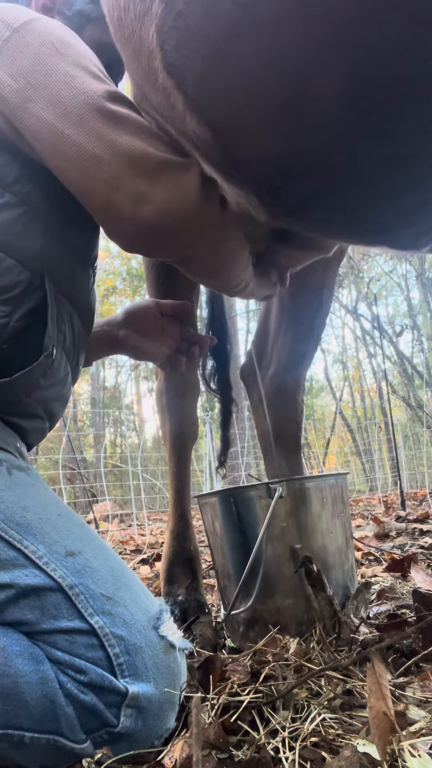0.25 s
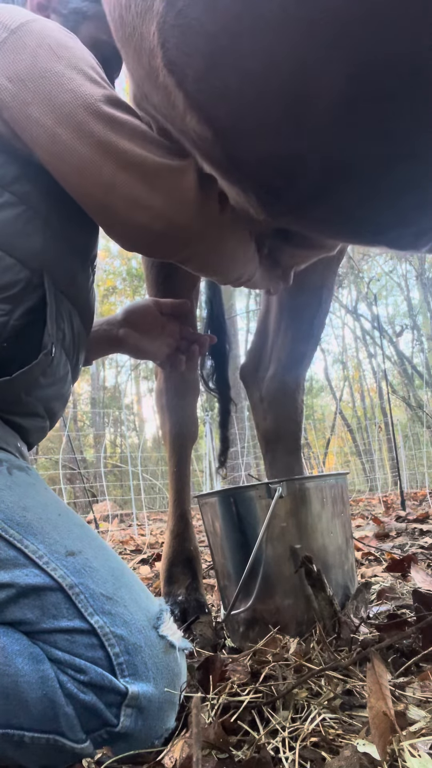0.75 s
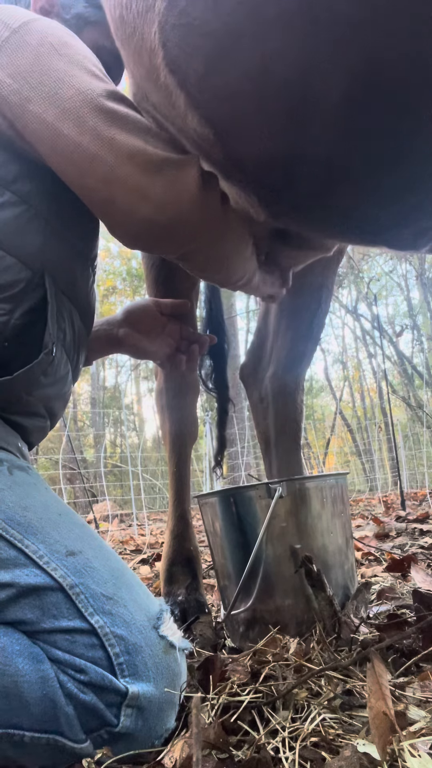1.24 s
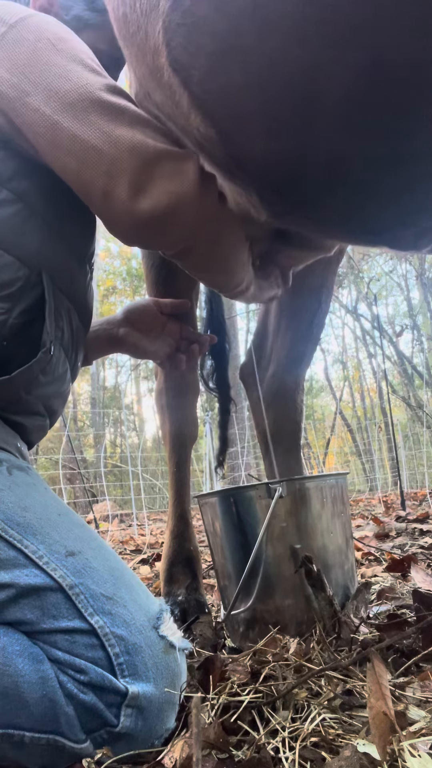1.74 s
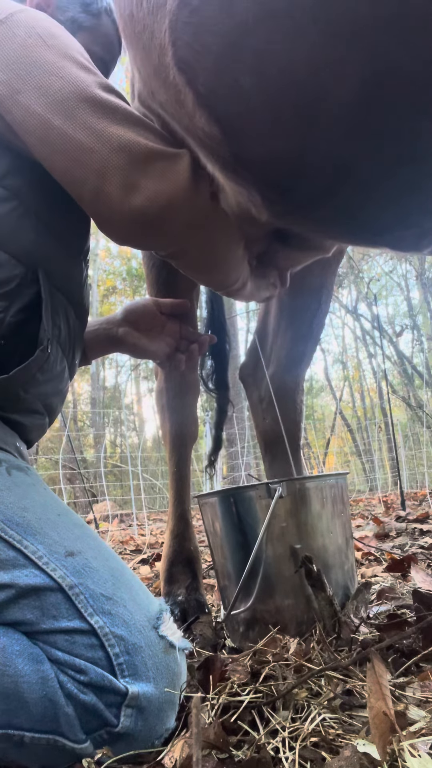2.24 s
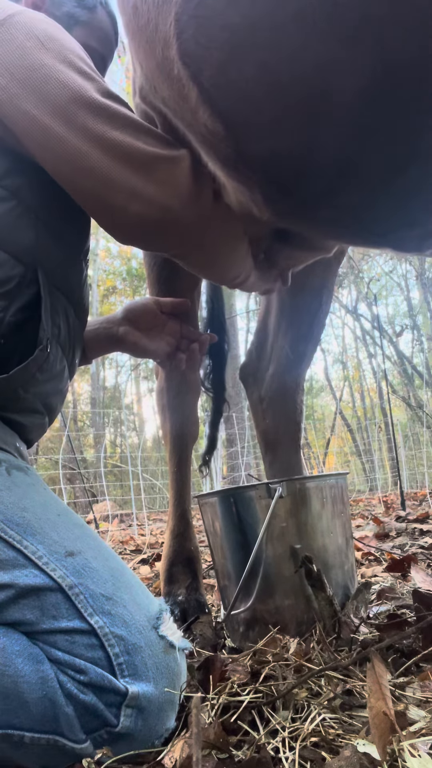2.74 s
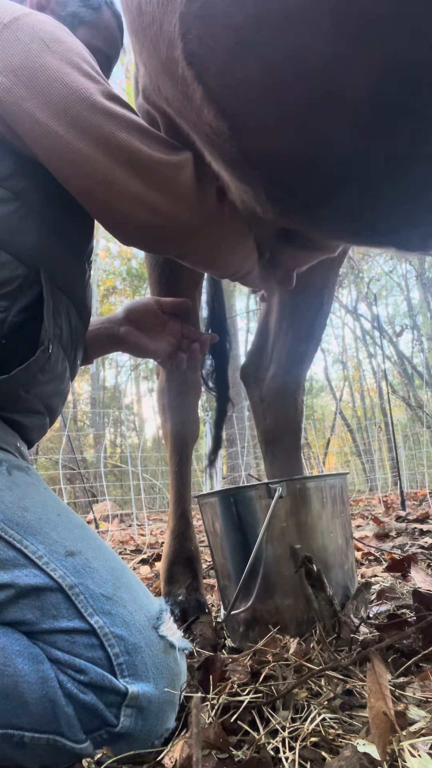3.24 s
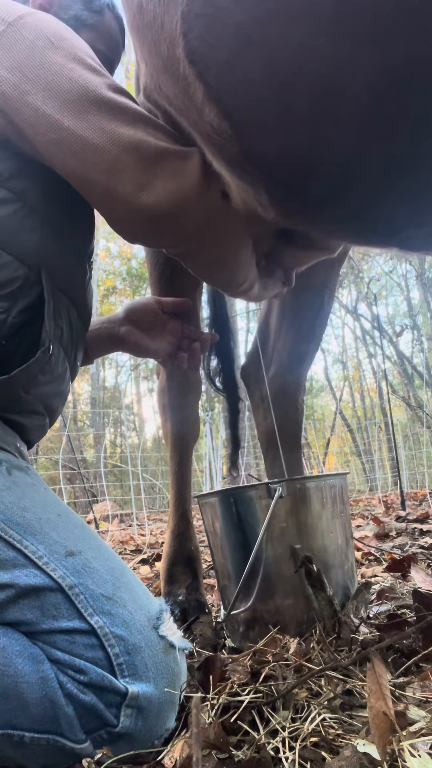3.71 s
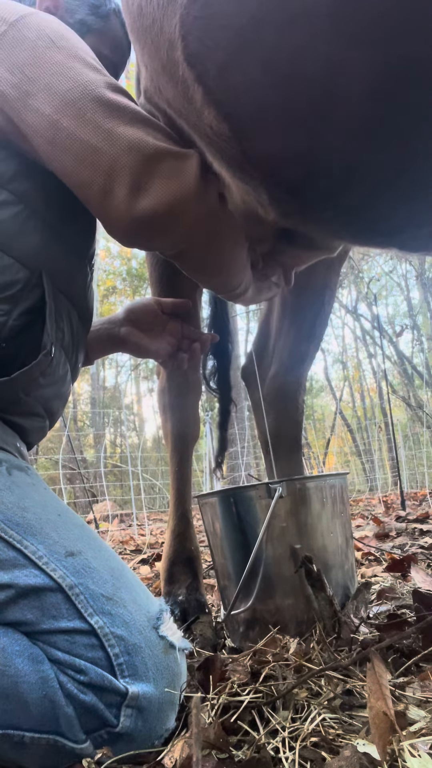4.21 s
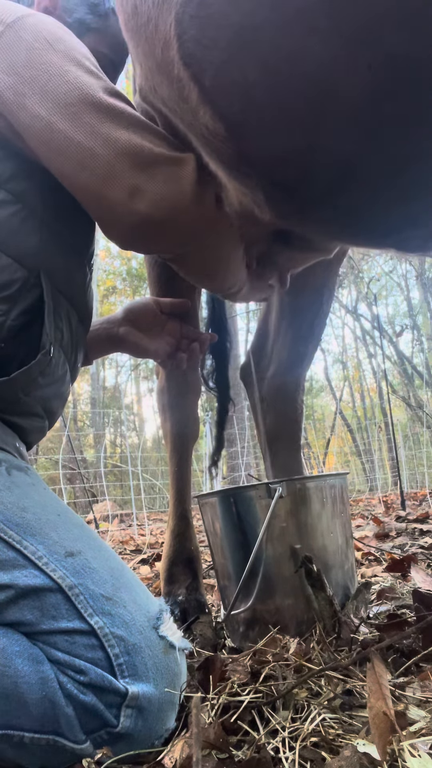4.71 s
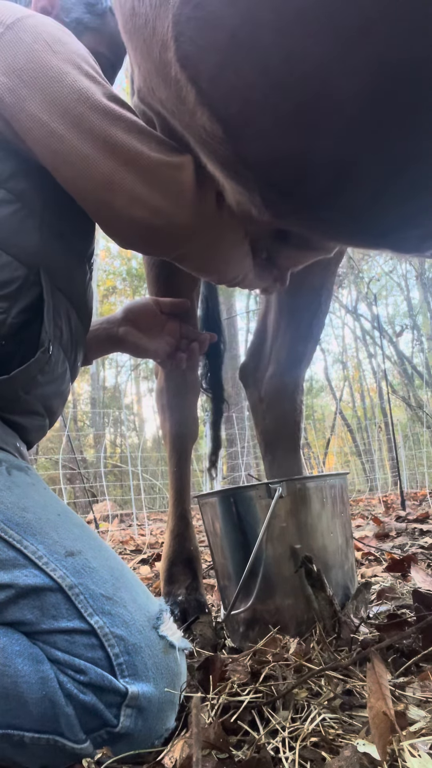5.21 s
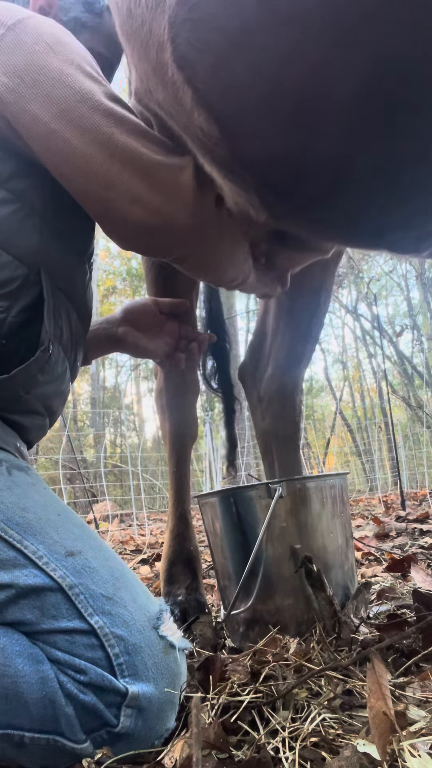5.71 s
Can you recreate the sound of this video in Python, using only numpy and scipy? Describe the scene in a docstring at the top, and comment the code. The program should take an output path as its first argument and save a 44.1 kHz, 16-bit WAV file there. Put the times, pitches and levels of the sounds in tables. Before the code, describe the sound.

Hand milking heard very close to a metal pail outdoors. The tail of one jet fades, then nine more follow at a steady pace, about one every two thirds of a second. Each swells as a foamy hiss, splats and gulps in the milk, rings the pail softly, then stops. Quiet woodland air and faint far rumble lie behind, in close stereo.

```python
"""Outdoors near woodland, close to a metal pail: a cow is milked by hand into frothy milk.
Nine jets plunge in after the tail of an earlier one. Each is shaped noise for spray, ringing bubbles
for froth and resonated clicks for the pail's air column; slugs splat, and trapped air gulps as short tones.
Behind lie a faint whine, filtered-noise woodland air and far rumble, all heard by two close microphone ports."""
import sys
import numpy as np
from scipy import signal
from scipy.fft import rfft, irfft
from scipy.io import wavfile
from scipy.ndimage import uniform_filter1d

SR = 44100
rng = np.random.default_rng(int(sys.argv[2]) if len(sys.argv) > 2 else 0)


def persist_wave(psi):
    """Save psi, clipped to +-1, as 16-bit WAV."""
    counts = np.round(np.clip(psi, -1, 1) * 32767).astype(np.int16)
    wavfile.write(sys.argv[1], SR, np.atleast_2d(counts).T)


N = 262836  # samples, just under 6 s

# Woodland air, relative spectrum: pitch_hz [Hz], level_db [dB per Hz]
AIR_SPECTRUM = [(15, -55), (25, -33), (59, 1.5), (107, 5.5), (314, -6.5), (724, -22.5), (973, -15.5),
                (1760, -42), (2300, -17), (3700, -16), (5000, -19), (9000, -34), (15700, -29)]
# Far rumble over time: time_s [s], level_db [dB]
RUMBLE_LEVEL = [(0.0, -50), (0.1, -74), (0.7, -70), (1.35, -57), (1.55, -67), (2.1, -59), (2.7, -60.5),
                (3.3, -61.5), (3.97, -55.5), (4.3, -60), (4.65, -70), (5.14, -55.5), (5.3, -78),
                (5.96, -69)]
# Far rumble, relative spectrum: pitch_hz [Hz], level_db [dB]
RUMBLE_SPECTRUM = [(20, -49), (45, -4.0), (75, 1), (130, -3.5), (230, -2.0), (500, -16.0), (900, -69)]
# Faint thin whine over time: time_s [s], level_db [dB], pitch_hz [Hz]
WHINE_CURVE = [(1.97, -93, 3500), (2.01, -71, 3530), (2.1, -65, 3740), (2.18, -66.5, 3800),
               (2.22, -81, 3730)]
# Pockets of air driven under the milk: start_s [s], level_db [dB], pitch_hz [Hz]
GULP_EVENTS = [(0.029, -46, 453), (0.304, -44, 382), (0.369, -39, 400), (0.448, -30.5, 442),
               (0.49, -28, 377), (0.513, -26.5, 362), (0.539, -26.5, 374), (0.63, -26, 375),
               (1.099, -26, 334), (1.144, -28, 348), (1.178, -37, 328), (1.615, -36, 370),
               (1.639, -44, 383), (1.74, -26.5, 363), (2.098, -33.5, 148), (2.285, -33, 382),
               (2.319, -28, 363), (2.349, -35, 350), (2.369, -28, 324), (2.429, -24, 331),
               (2.917, -41, 352), (3.001, -30, 350), (3.093, -31.5, 329), (3.54, -28, 352),
               (3.565, -35.5, 362), (3.601, -20.5, 362), (3.69, -46, 340), (3.755, -28, 336),
               (3.765, -34.5, 490), (3.779, -36, 317), (4.094, -40, 248), (4.154, -26.5, 369),
               (4.242, -49, 350), (4.405, -39, 311), (4.453, -48, 354), (4.739, -32, 395),
               (4.801, -22, 348), (4.88, -36, 378), (4.931, -29, 352), (5.114, -30, 157), (5.404, -37, 342),
               (5.454, -39, 380), (5.512, -34, 325), (5.612, -35, 348)]
# Slugs of milk breaking on the surface: start_s [s], level_db [dB], bubble_hz [Hz],
# bubble_over_spray_db [dB], bright_band_hz [Hz]
SPLAT_EVENTS = [(0.02, -45, 2550, -23, 3600), (0.2319, -41, 1950, -3.5, 5740),
                (0.2658, -52, 1550, -14, 6540), (0.3231, -34.5, 1460, -7.5, 7440),
                (0.359, -35, 1460, -16, 5420), (0.4033, -29.5, 1840, -10.5, 3660),
                (0.4782, -40, 1400, -6, 3640), (0.5539, -33.5, 1980, -13, 5460),
                (0.603, -44, 1390, -6, 8800), (0.678, -53, 1460, -2, 6100), (0.746, -63, 1460, 11, 3910),
                (0.9007, -44, 2360, -12.5, 6380), (0.9281, -43, 2300, -3.5, 6400),
                (1.017, -42, 1480, 2.5, 2950), (1.2236, -39.5, 2250, -7.5, 6650),
                (1.27, -47, 2026, 5, 6550), (1.321, -43.5, 1585, -9.5, 3100),
                (1.5505, -42.5, 1590, -11.5, 6460), (1.5958, -42.5, 2240, 1, 4900),
                (1.6487, -34.5, 2340, 0.5, 2800), (2.193, -46.5, 1950, -16, 4640),
                (2.2125, -42.5, 1950, -10.5, 6400), (2.2689, -47, 1690, 7.5, 8400),
                (2.2949, -43.5, 1460, 13, 4960), (2.5007, -40, 2170, -1.5, 10100),
                (2.616, -65, 1540, 4, 2860), (2.6609, -61, 1370, 4.5, 2990), (2.825, -39, 1680, -25, 6600),
                (2.8647, -36, 1540, -18.5, 4650), (2.9237, -35, 1610, -8, 9600),
                (2.9462, -39.5, 1450, 6, 2860), (2.9783, -36, 1460, 4.5, 6100),
                (3.257, -48, 1570, -21, 8250), (3.463, -35.5, 1860, -35, 7600),
                (3.4796, -35, 1190, -11, 6800), (3.5359, -29.5, 1940, -6.5, 8470),
                (3.5792, -30.5, 1630, -16, 7260), (3.681, -42.5, 970, 2, 7300),
                (3.742, -45, 1550, -22.5, 6200), (3.7712, -35, 1020, -9, 9300),
                (4.0114, -61.5, 950, 6.5, 4030), (4.0887, -48, 960, -4, 3700),
                (4.109, -37, 2270, -14, 7840), (4.134, -43, 1600, -21, 5150), (4.1585, -52, 1615, 9, 6400),
                (4.1935, -35.5, 1536, -3.5, 8000), (4.4105, -39, 1006, -5.5, 9100),
                (4.5208, -51, 1090, -8, 7000), (4.6087, -61.5, 2110, 3.5, 2820),
                (4.717, -46, 1510, -30, 10100), (4.7368, -30, 1380, -34, 11500),
                (4.7984, -33.5, 1855, 4, 3600), (4.832, -33, 1450, -4.5, 3600),
                (5.0863, -56, 2220, -14, 9700), (5.1437, -47.5, 1020, -6.5, 3450),
                (5.3513, -48.5, 1940, -15, 5570), (5.3773, -46, 1980, -21, 7040),
                (5.434, -36.5, 2220, -2.5, 9300), (5.488, -38.5, 1465, 4, 6840),
                (5.7234, -51, 1810, -20, 6400), (5.789, -47.5, 1860, -2, 4800),
                (5.8542, -56, 2350, 0, 3880)]
# Spray hiss, relative spectrum: pitch_hz [Hz], level_db [dB per Hz]
SPRAY_SPECTRUM = [(400, -59), (1000, -9), (2000, -3), (3000, -2), (4200, -3), (6400, -0.5), (7400, -3),
                  (10500, 1), (15700, -4)]
# Resonances of the pail above the milk: pitch_hz [Hz], width_hz [Hz], level_db [dB]
PAIL_MODES = [(636, 70, -9.5), (954, 220, -6), (1190, 53, -6.5), (1460, 150, -10), (1618, 47, -4.5),
              (1950, 92, -6.5), (2220, 27.6, -1.5), (2640, 27, -44), (3500, 110, -9), (4380, 130, -11)]
# One row per squeeze: start_s [s], full_pressure_after_s [s], column_stilled_after_s [s], length_s [s],
# spray first_db, full_db, last_db [dB]; froth full_db, end_db, settling_db [dB];
# air column early_db, late_db [dB], pitch_hz [Hz]
SQUEEZES = [(-0.4, .1, .38, 0.42, -31, -46, -51.5, -44, -59, -60.5, -45, -50, 430),
            (0.229, 0.18, 0.4, 0.48, -50.5, -44.5, -62, -41.5, -57, -72, -46.5, -45, 358.5),
            (0.897, 0.15, 0.34, 0.4, -47, -44, -57.5, -41, -59, -62.5, -47, -45.5, 357),
            (1.543, 0.13, 0.27, 0.35, -50, -43.5, -53, -42.5, -53, -56.5, -47.5, -41, 366),
            (2.193, 0.12, 0.29, 0.35, -48.5, -46, -55.5, -43.5, -52.5, -60, -46, -42.5, 350),
            (2.818, 0.15, .33, 0.37, -50, -45, -55, -40.5, -56.5, -64.5, -45, -48, 365),
            (3.456, 0.11, 0.36, 0.42, -46.5, -47.5, -59, -41.5, -63.5, -67, -45.5, -45.5, 354),
            (4.088, 0.12, .38, .37, -45, -46.5, -60, -41, -59, -63.5, -49.5, -50, 365),
            (4.713, 0.099, 0.29, 0.39, -49, -43, -60.5, -40.5, -59.5, -72, -45, -46.5, 364),
            (5.353, 0.12, 0.36, 0.37, -44.5, -46, -56.5, -40.5, -57, -64, -42.5, -50, 371)]
# Phase between the microphone ports: pitch_hz [Hz], left_lead_rad [radians]
PORT_LEAD = [(60, -.07), (600, -.25), (800, 1), (1150, 1.3), (1450, -.3), (2450, -.15), (2750, -1.5),
             (3080, -2.9), (3450, 0), (6500, -.12), (8600, -.95), (11200, -1.95), (13500, -np.pi),
             (16000, -np.pi)]
# Level between the ports: pitch_hz [Hz], left_over_right_db [dB]
PORT_TILT = [(40, 0), (110, -2), (260, -5), (450, -5.5), (620, -9), (950, -2.5), (1290, 3), (1600, 0),
             (16000, 0)]
# Likeness of the ports: pitch_hz [Hz], likeness [0 to 1]
PORT_LIKENESS = [(60, .996), (200, .985), (450, .97), (750, .3), (950, .7), (1290, .5), (1500, .95),
                 (2300, .88), (2600, .4), (3050, .8), (3300, .3), (4000, .85), (4800, .25), (6400, .96),
                 (8600, .8), (12500, .8), (14000, 1)]

EDGE_HZ = 15750  # upper band limit
AIR_DB = -62
GULP_T60_S, GULP_RISE_S = 0.081, 0.0085
KNOCK_DB = 12.5  # short knock of a slug, against its bubble
SILENT_DB, TAIL_S = -95, .4  # level around each stroke, and length of its last fade
SPRAY_RISE_S, SPRAY_STOP_S, SPRAY_STOP_DB, SPRAY_FADE_DB_PER_S = 0.022, 0.048, -13, 11
FROTH_START_DB, FROTH_EASE_S, FROTH_EASE_DB = -25.5, 0.057, -7
FROTH_STOP_S, FROTH_FADE_DB_PER_S = 0.026, 60
COLUMN_START_DB, COLUMN_STILL_S, COLUMN_STILL_DB = -24.5, 0.024, -12
COLUMN_FADE_DB_PER_S, COLUMN_SAG_HZ_PER_S = 91, 94
THRUM_DB = -10.5  # low thrum of the pail, against the air column


def gain_of(db):
    """Decibels to amplitude."""
    return 10 ** (np.asarray(db) / 20)


def evened(x):
    """Scales to rms 1."""
    return x / np.sqrt(np.mean(x ** 2) + 1e-20)


def read(points, hz):
    """Reads a spectrum table at given frequencies, on a log frequency scale."""
    table_hz, value = np.transpose(points)
    return np.interp(np.log(hz + 1), np.log(table_hz + 1), value)


def curve(rows, axis):
    """One column of a time table at every sample."""
    rows = np.array(rows)
    return np.interp(np.arange(N) / SR, rows[:, 0], rows[:, axis])


def add(mix, start_s, sound):
    """Adds a sound into the mix at its start time."""
    part = mix[round(start_s * SR):][:len(sound)]
    part += sound[:len(part)]


def size_of(seconds):
    """Number of short-time frames in a duration."""
    return max(round(seconds * SR / 128), 1)


def coloured(x, points):
    """Filters a sound by the spectrum of a table."""
    hz = np.fft.rfftfreq(N, 1 / SR)
    return irfft(rfft(x) * gain_of(read(points, hz)), N)


def resonate(x, hz, width):
    """Shifts a fixed or gliding pitch to zero, smooths, and shifts back: a resonance of gain 1."""
    turn = np.exp(2j * np.pi * np.cumsum(hz * np.ones(len(x))) / SR)
    r = np.exp(-np.pi * width / SR)
    return 2 * (turn * signal.lfilter([1 - r], [1, -r], x / turn)).real


def pail_ring(x):
    """The metal pail answers a sound with all its resonances."""
    return sum(gain_of(db) * resonate(x, hz, width) for hz, width, db in PAIL_MODES)


def patchy(x, depth_db, frames, bins):
    """Random loud and soft patches in time and frequency, evened to rms 1."""
    z = signal.stft(x, SR, nperseg=256)[2]
    field = rng.standard_normal(z.shape[::-1])
    field = uniform_filter1d(field, size=frames, axis=0)
    field = evened(uniform_filter1d(field, size=bins, axis=1))
    return evened(signal.istft(z * gain_of(depth_db * field.T), SR, nperseg=256)[1][:N])


def flutter(per_s, depth_db):
    """A gain of rms 1 that swells and sags as lumps of the jet land."""
    lumps = rng.exponential(1, N) * (rng.random(N) < per_s / SR)
    lump = signal.windows.hann(round(.9 * SR / per_s))
    swell = np.minimum(signal.oaconvolve(lumps, lump, "same"), 4)
    return evened(gain_of(depth_db * swell))


def drops(per_s, spread_db):
    """Sparse clicks of either sign; a few are large."""
    size = gain_of(spread_db * np.minimum(rng.exponential(1, N), 5)) * rng.choice([-1, 1], N)
    return evened(size * (rng.random(N) < per_s / SR))


def bubble(hz, t60, rise, phase):
    """A ringing pocket of air whose pitch climbs as it nears the surface."""
    t = np.arange(round(abs(t60) * SR) + 99) / SR
    tone = np.sin(2 * np.pi * hz * t * (1 + 0.5 * t) + phase)
    return tone * (1 - np.exp(-t / rise)) * gain_of(-60 * t / t60)


def fizz(lo_hz, hi_hz, per_s, cycles, spread_db, count=14):
    """Small bubbles of many sizes, each dying 60 dB in the given number of cycles."""
    births, kind = drops(per_s, spread_db), rng.integers(0, count, N)
    out = np.zeros(N)
    for k, hz in enumerate(np.geomspace(lo_hz, hi_hz, count)):
        ring = bubble(hz, cycles / hz, 0.67 / hz, 0)
        out += signal.oaconvolve(births * (kind == k), ring)[:N] * hz ** 0.64
    return evened(out)


def woods():
    """Faint patchy air and a low wavering rumble, both from filtered noise."""
    air = coloured(rng.standard_normal(N), AIR_SPECTRUM)
    air = patchy(air, 2.5, size_of(.04), bins=3)
    rumble = coloured(rng.standard_normal(N), RUMBLE_SPECTRUM)
    rumble = rumble + 0.51 * resonate(rumble, 80, 19)  # a dull hum stands out
    return gain_of(AIR_DB) * air + gain_of(curve(RUMBLE_LEVEL, axis=1)) * evened(rumble)


def whine():
    """Narrow-band noise: a thin, mostly rising tone, clearest between two jets."""
    tone = resonate(rng.standard_normal(N), curve(WHINE_CURVE, axis=2), 180)
    return gain_of(curve(WHINE_CURVE, axis=1)) * evened(tone)


def gulps():
    """Pockets of air ring as low round blips that swell and die."""
    out = np.zeros(N)
    phases = rng.uniform(0, 2 * np.pi, len(GULP_EVENTS))
    for (start_s, db, hz), phase in zip(GULP_EVENTS, phases):
        add(out, start_s, gain_of(db) * bubble(hz, GULP_T60_S, GULP_RISE_S, phase))
    return resonate(out, 378, 30) * 0.27 + out  # the pail wall rings on


def splats(t60=0.034):
    """Each slug throws a burst of spray and leaves a short bubble that shakes the pail."""
    spray = evened(coloured(rng.standard_normal(N), SPRAY_SPECTRUM))
    bursts, plops = np.zeros(N), np.zeros(N)
    for start_s, db, hz, bubble_db, bright_hz in SPLAT_EVENTS:
        burst = spray[round(start_s * SR):][:round(t60 * SR)]
        t = np.arange(len(burst)) / SR
        # a narrow bright band stands out in the burst
        burst = .5 * burst + evened(resonate(burst, bright_hz, 810))
        add(bursts, start_s, gain_of(db - 60 * t / t60) * (1 - np.exp(-t / 0.0023)) * burst)
        plop_db = db + bubble_db
        add(plops, start_s, gain_of(plop_db) * bubble(hz, 0.037, 0.00048, 0))
        add(plops, start_s, gain_of(plop_db + KNOCK_DB) * bubble(1560, 0.0028, 0.0003, 0))
    return bursts + plops + 1.18 * pail_ring(plops)


def strokes():
    """Gains of spray, froth and air column over the squeezes, and the sagging pitch of the column."""
    t, gains, pitch = np.arange(N) / SR, np.zeros((3, N)), []
    for (start, full, still, length, first_db, spray_db, last_db,
         froth_db, thin_db, settle_db, early_db, column_db, hz) in SQUEEZES:
        # breakpoints: seconds after the start, dB
        stopped_db = last_db + SPRAY_STOP_DB
        spray = [(SPRAY_RISE_S, first_db), (full, spray_db), (length, last_db),
                 (length + SPRAY_STOP_S, stopped_db),
                 (length + TAIL_S, stopped_db - SPRAY_FADE_DB_PER_S * TAIL_S)]
        froth = [(.01, froth_db + FROTH_START_DB), (full, froth_db),
                 (full + FROTH_EASE_S, froth_db + FROTH_EASE_DB),
                 (length, thin_db), (length + FROTH_STOP_S, settle_db),
                 (length + TAIL_S, settle_db - FROTH_FADE_DB_PER_S * TAIL_S)]
        stilled_db = column_db + COLUMN_STILL_DB
        column = [(.01, early_db + COLUMN_START_DB), (full, early_db), (still, column_db),
                  (still + COLUMN_STILL_S, stilled_db),
                  (still + TAIL_S, stilled_db - COLUMN_FADE_DB_PER_S * TAIL_S)]
        for gain, shape in zip(gains, (spray, froth, column)):
            points = [(-.01, SILENT_DB)] + shape + [(shape[-1][0] + .1, SILENT_DB)]
            after_s, db = np.transpose(points)
            add(gain, 0, gain_of(np.interp(t - start, after_s, db, -200, -200)))
        pitch += [(start + full / 2, hz), (start + length, hz - COLUMN_SAG_HZ_PER_S * length)]
    return (*gains, curve(pitch, axis=1))


def jet():
    """Spray hiss and froth bubbles share one uneven flow; clicks and noise ring the air column."""
    spraying, frothing, stirring, hz = strokes()
    flow = flutter(75, depth_db=2.0)

    hiss = rng.standard_normal(N) + 0.65 * fizz(2906, 14230, 1500, 33, 4.4)
    spray = patchy(coloured(hiss, SPRAY_SPECTRUM), 2.6, size_of(0.049), bins=5)

    froth = patchy(fizz(452.4, 3175, 3000, 31, 2.44, count=24), 4.3, size_of(0.033), bins=3)
    froth = evened(0.5 * froth + evened(pail_ring(froth)))

    column = resonate(resonate(drops(500, spread_db=1.5), hz, 180), hz, 180)
    wall = evened(resonate(column, 377.2, 30))  # the pail wall joins in
    column = evened(evened(resonate(column, hz, 45)) + 0.53 * wall)
    thrum = evened(resonate(resonate(rng.standard_normal(N), 185, 210), 185, 210))

    surface = spraying * spray * flow + frothing * froth * flow ** 0.77
    return surface + stirring * (column + gain_of(THRUM_DB) * thrum)


def decorrelated(x):
    """A delayed copy with random phases, which makes the two ports differ and sounds wide."""
    z = signal.stft(x, SR, nperseg=512)[2]
    turns = np.exp(2j * np.pi * rng.random(z.shape[::-1]).T)
    shuffled = signal.istft(z * turns, SR, nperseg=512)[1]
    return np.append(np.zeros(256), evened(shuffled))[:N] * np.std(x)


def scene():
    """Direct sound, and the random-phase copy that differs between the ports."""
    direct = jet() + splats() + gulps() + whine() + woods()
    return np.array([direct, decorrelated(direct)])


def record(dry):
    """Two close microphone ports hear the pail with a phase lead and a level tilt; then the band limit."""
    hz = np.fft.rfftfreq(N, 1 / SR)
    direct, other = rfft(dry)
    alike = np.clip(read(PORT_LIKENESS, hz), 0, 1)
    shared = np.sqrt((1 + alike) / 2) * direct
    apart = np.sqrt((1 - alike) / 2) * other
    # half the tilt and lead goes to the left, the opposite half to the right
    half = gain_of(read(PORT_TILT, hz) / 2) * np.exp(.5j * read(PORT_LEAD, hz))
    left = (shared + apart) * half
    right = (shared - apart) * half.conj() / abs(half) ** 2
    ports = irfft([left, right], N)
    band = signal.firwin(511, EDGE_HZ, window=("kaiser", 9), fs=SR)
    return signal.oaconvolve(ports, band[None], "same")


dry = scene()
out = record(dry)
persist_wave(out)
```